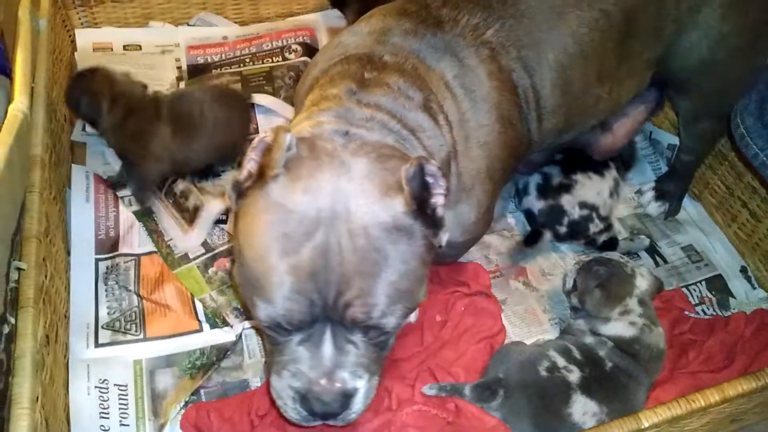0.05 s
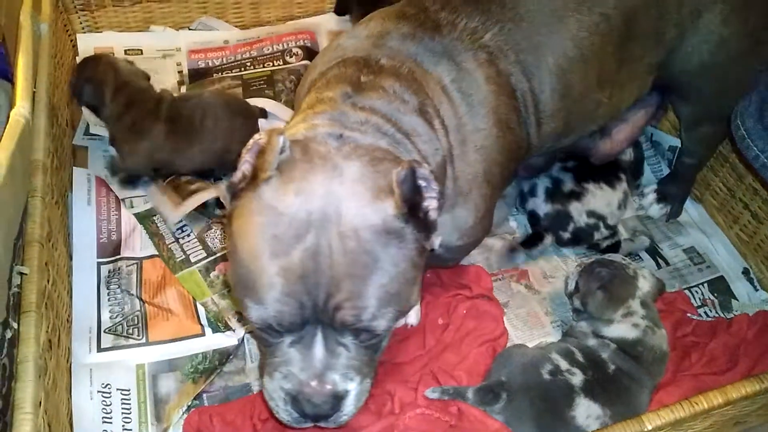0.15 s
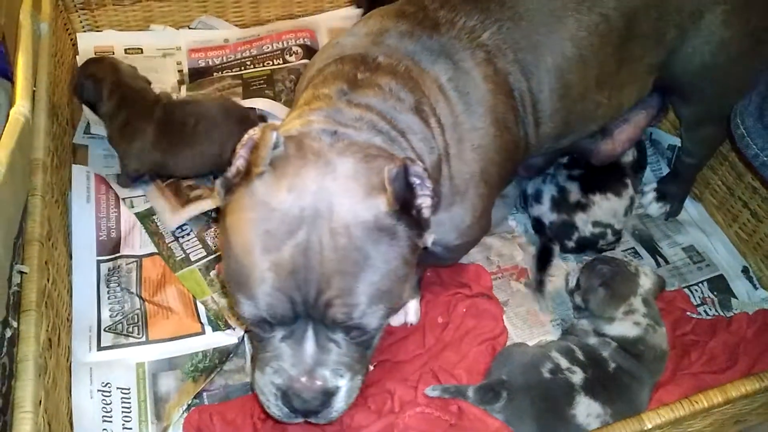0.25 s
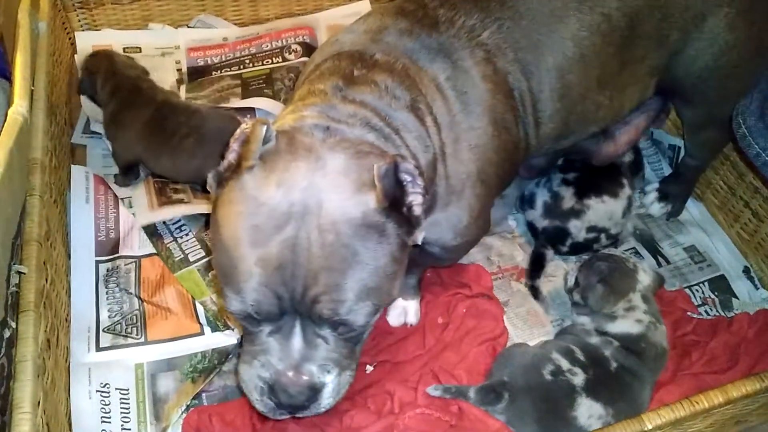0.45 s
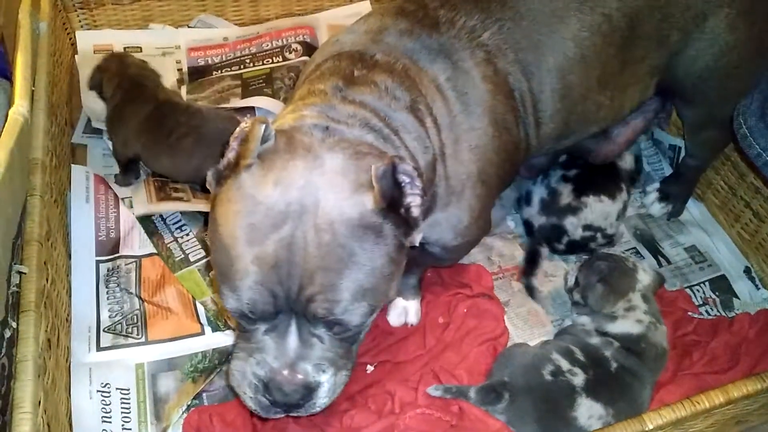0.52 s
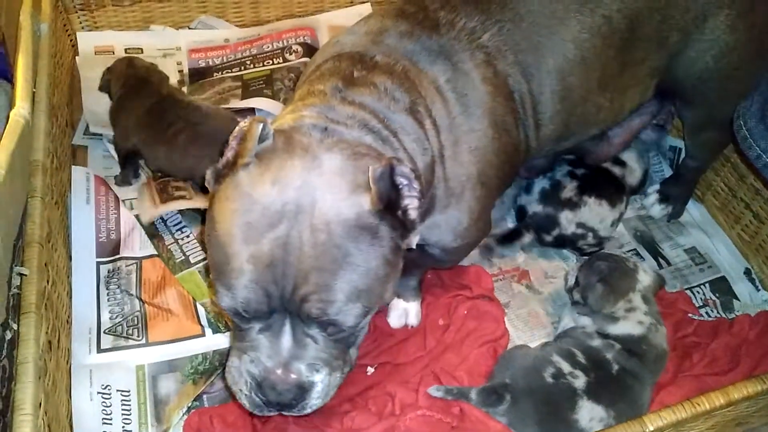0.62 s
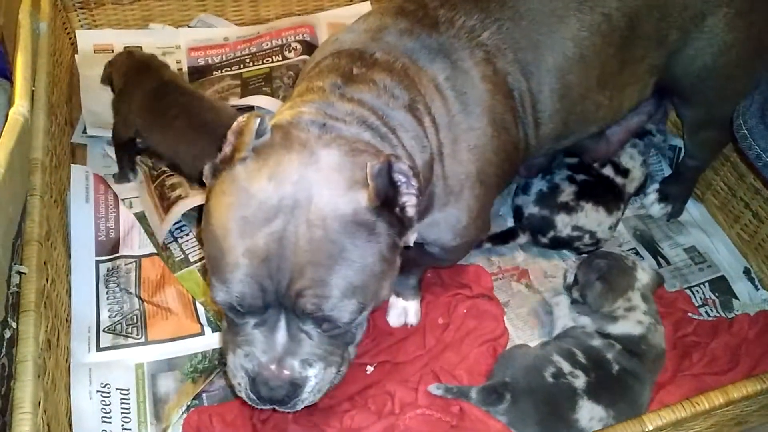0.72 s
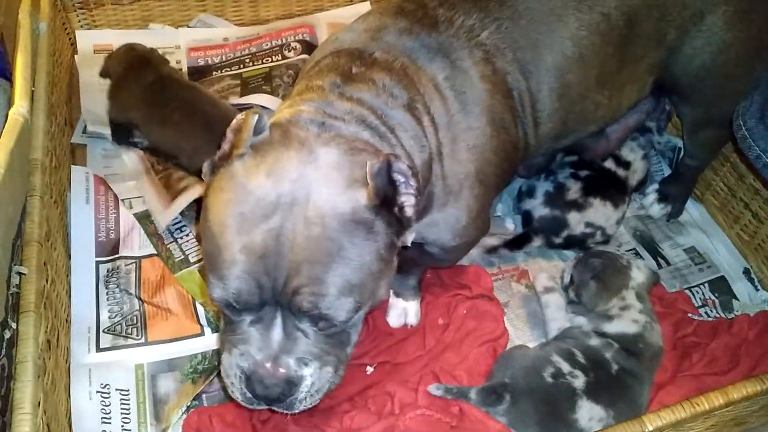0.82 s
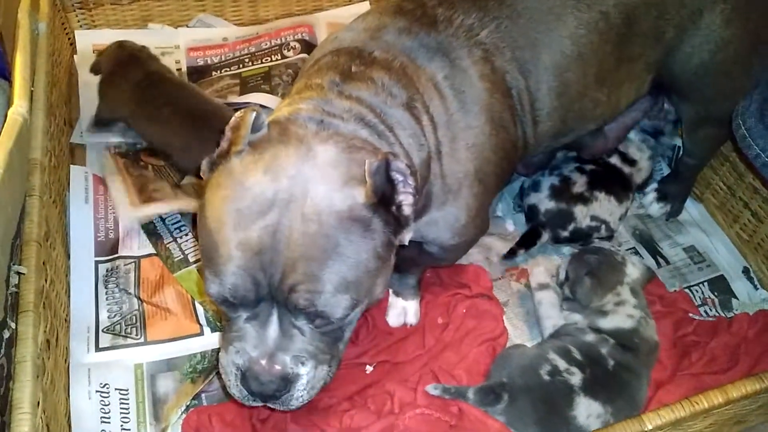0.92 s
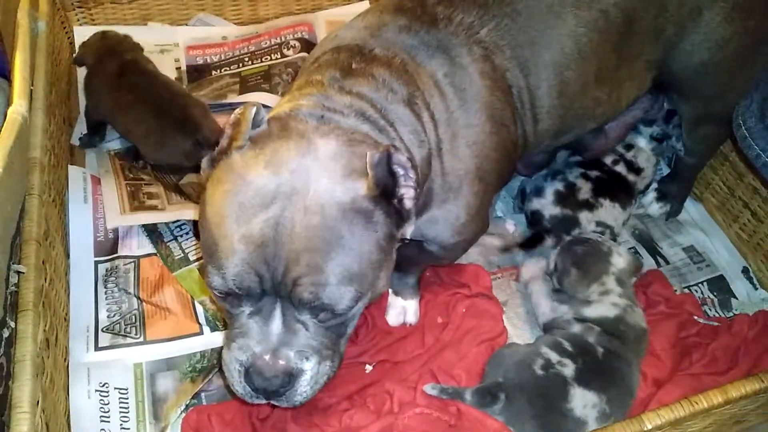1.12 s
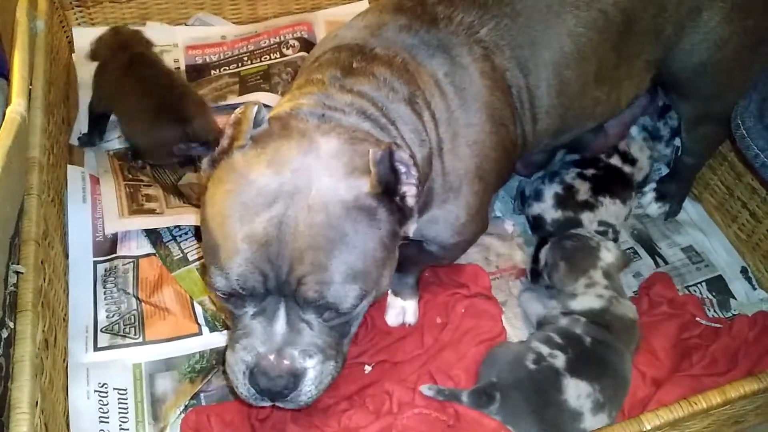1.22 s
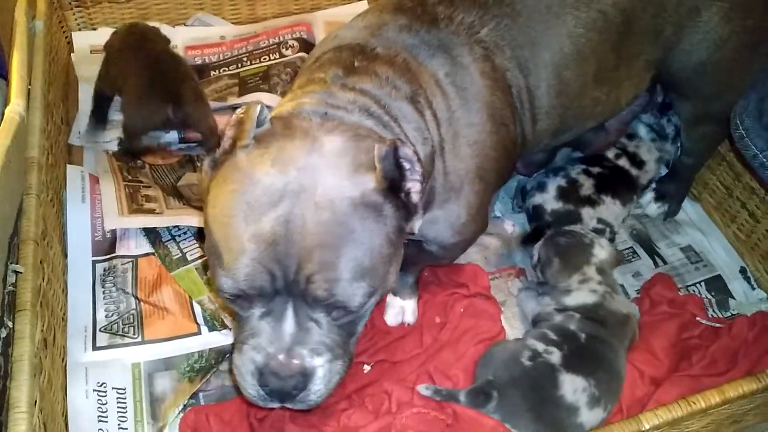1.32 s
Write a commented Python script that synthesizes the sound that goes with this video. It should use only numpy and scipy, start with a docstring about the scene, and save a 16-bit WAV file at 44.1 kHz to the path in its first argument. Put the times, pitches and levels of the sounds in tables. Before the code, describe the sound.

Paper slides and crackles under the paws of dogs moving in a basket.

```python
"""A dog and her puppies shift on newspaper in a wicker basket, close to a phone in a small room.
After a moment of silence, sheets slide with a fine crackle and bodies rumble over the padded floor.
Paws thud and crumple the paper; its creases snap, loudest at 0.9 s. Then the sliding falls away,
leaving a few last crumples, rasps, small knocks and thuds. Throughout, the room gives the paper
a short tail and the microphone ports ring in the high treble."""
import sys
import numpy as np
from scipy import signal
from scipy.fft import rfft, irfft
from scipy.io import wavfile
from scipy.ndimage import uniform_filter1d

SR = 44100
rng = np.random.default_rng(int(sys.argv[2]) if len(sys.argv) > 2 else 0)


def unload_audio(sound):
    """Save the sound as a 16-bit wav file, at the path given as the first command line argument."""
    columns = np.transpose(np.atleast_2d(sound))
    # keep every value between -1 and 1, then stretch to whole-number steps
    steps = np.round(np.clip(columns, -1, 1) * 32767)
    wavfile.write(sys.argv[1], SR, steps.astype(np.int16))


N = 59535
TIME_S = np.arange(N) / SR
BIN_HZ = np.fft.rfftfreq(N, 1 / SR)


def undb(db):
    """Decibels to gain."""
    return 10 ** (np.asarray(db) / 20)


def unit(x):
    """Scale to rms 1."""
    return x / np.sqrt(np.mean(x ** 2))


def fader(points):
    """Gain riding through (time_s, level_db) points."""
    return undb(np.interp(TIME_S, *np.array(points).T))


def swell(peak_s, rise_s, decay_s):
    """Exponential rise to a peak, then exponential decay."""
    t = TIME_S - peak_s
    return np.exp(np.minimum(t / rise_s, -t / decay_s))


def pan(db):
    """Left and right gains, the left louder by db."""
    return undb(np.array([[db], [-db]]) / 2)


def equalise(x, points):
    """Minimum-phase EQ of unit power through (freq_hz, gain_db) points."""
    hz, db = np.array(points).T
    log_hz = np.log(np.fft.rfftfreq(2 * N, 1 / SR) + 1)
    gain = unit(undb(np.interp(log_hz, np.log(hz), db)))
    cepstrum = irfft(np.log(gain))[:N]
    cepstrum[1:] *= 2
    return irfft(rfft(x, 2 * N) * np.exp(rfft(cepstrum, 2 * N)))[..., :N]


def band(x, centre_hz, width_hz, order=1):
    """Band-pass of gain 1 at the centre."""
    low = np.hypot(centre_hz, width_hz / 2) - width_hz / 2
    return signal.sosfilt(signal.butter(order, [low, low + width_hz], "band", fs=SR, output="sos"), x)


def soften(x, top_hz):
    """Gentle low-pass: softer folds give less of the highest treble."""
    return signal.sosfilt(signal.butter(2, top_hz, fs=SR, output="sos"), x + 1e-18)


APART_HZ, LEFT_LEAD_S = 1190, 0.00012
def mic_pair(pair):
    """Two unrelated signals become stereo: alike in the bass, apart in the treble, left just ahead."""
    angle = np.pi / 4 * np.minimum(0.23 + 0.87 * BIN_HZ / (BIN_HZ + APART_HZ), 1)
    mid, side = rfft(pair) * np.array([np.cos(angle), np.sin(angle)])
    right_delay = np.exp(-2j * np.pi * BIN_HZ * LEFT_LEAD_S)
    return irfft(np.array([mid + side, (mid - side) * right_delay]), N)


def stereo_noise():
    """White noise spread across the two microphone ports."""
    return mic_pair(rng.standard_normal((2, N)))


# EQ of the quiet room: freq_hz, gain_db
ROOM_TONE_EQ = [(25, -14), (80, 2), (300, -11), (1000, -17), (4000, -10.5), (16000, -40)]
def room_tone(level_db=-80.5):
    """A faint, steady bed of bass-heavy noise."""
    return undb(level_db) * equalise(stereo_noise(), ROOM_TONE_EQ)


# Fader ride of the dragging: time_s, level_db
DRAG_FADER = [(.13, -92), (.19, -72), (.24, -67.5), (.32, -59.5), (.41, -65), (.50, -58.5), (.59, -63.5),
              (.68, -59.5), (.75, -57), (.83, -63), (.89, -65), (.93, -85), (1.04, -78.5), (1.10, -95),
              (1.35, -77.5)]
# EQ of the padded floor: freq_hz, gain_db
DRAG_EQ = [(25, -35), (50, -8), (95, 4), (160, -8.5), (230, -1), (380, -8), (510, 0), (750, -9),
           (1500, -16.5), (4000, -52)]
def basket_rumble():
    """Bodies drag over the padded floor with a low rumble."""
    return equalise(stereo_noise(), DRAG_EQ) * fader(DRAG_FADER)


# Paws landing: start_s, pitch_hz, decay_s, level_db
PAW_THUDS = [(0.247, 60, 0.025, -59.5), (0.636, 119, 0.0089, -43.5), (0.643, 51, 0.026, -52),
             (.745, 69, .02, -50.5), (.812, 85, 0.012, -57), (.945, 70.4, .012, -64),
             (1.032, 85, 0.0085, -67), (1.21, 81.5, 0.0097, -51.5), (1.236, 59.4, 0.01, -51)]
def paw_thuds(rise_s=0.0034):
    """Each paw knocks the basket floor into a low, quickly damped tone."""
    out = 0
    for start_s, pitch_hz, decay_s, level_db in PAW_THUDS:
        t = np.maximum(TIME_S - start_s, 0)
        envelope = (1 - np.exp(-t / rise_s)) * np.exp(-t / decay_s)
        out = out - undb(level_db) * np.sin(2 * np.pi * pitch_hz * t) * envelope
    return out


def crackle(grains_per_s=2300, spread_db=3.5, max_spreads=3.42, hiss_db=-4):
    """Paper fibres catch and let go: dense clicks of uneven size over a fine hiss."""
    hits = rng.random((2, N)) < grains_per_s / SR
    size = undb(spread_db * np.minimum(rng.exponential(size=(2, N)), max_spreads))
    polarity = np.sign(rng.standard_normal((2, N)))
    hiss = undb(hiss_db) * rng.standard_normal((2, N))
    return unit(mic_pair(unit(hits * size * polarity) + hiss))


# Fader ride of the sliding: time_s, level_db
SLIDE_FADER = [(.13, -72.5), (.16, -67.5), (.22, -57.5), (.275, -61), (.31, -54.5), (.37, -57),
               (.42, -59.5), (.46, -51.5), (.53, -56), (.59, -57), (.65, -53), (.69, -57.5), (.77, -50.5),
               (.87, -51.5), (.95, -72), (1.03, -74), (1.08, -79.5), (1.35, -78)]
# EQ of paper on paper: freq_hz, gain_db
SLIDE_EQ = [(150, -28), (500, -3), (1000, 0), (2000, -1), (4000, 0.5), (7000, 2), (10000, 3.5), (13000, 1),
            (16000, -2)]
def sliding_sheets(catch_db=1.3):
    """Sheets rub over each other, catching unevenly so the level flutters."""
    catch = unit(uniform_filter1d(rng.standard_normal(N), size=300))
    return equalise(crackle() * fader(SLIDE_FADER) * undb(catch_db * catch), SLIDE_EQ)


# Rasps and knocks: peak_s, rise_s, decay_s, centre_hz, width_hz, level_db
RASPS_AND_KNOCKS = [(0.2027, 0.00037, 0.0016, 2450, 1800, -48.5), (0.2027, .0004, 0.0093, 10940, 1780, -47),
                    (0.351, 0.00088, 0.011, 2260, 930, -53.5), (0.365, 0.0036, 0.0055, 2220, 895, -64),
                    (.511, .001, 0.0069, 4400, 1500, -48), (.567, 0.0033, 0.012, 1100, 550, -54.5),
                    (1.01, 0.0065, 0.0059, 470, 390, -57), (1.007, 0.0068, 0.0064, 1460, 1300, -50),
                    (1.126, 0.0033, 0.0065, 1120, 500, -64.5), (1.126, 0.0048, 0.017, 6340, 2200, -57.5),
                    (1.169, 0.0088, 0.016, 7000, 2560, -66), (1.166, 0.017, 0.0089, 1700, 1840, -75),
                    (1.214, 0.0014, 0.011, 226, 159, -67.5), (1.293, 0.0083, 0.0093, 1185, 550, -55.5),
                    (1.290, 0.0068, 0.016, 310, 201, -69.5)]
def rasps_and_knocks():
    """Brief paper rasps and small low knocks, each a band of crackle."""
    clicks, out = crackle(), 0
    for peak_s, rise_s, decay_s, centre_hz, width_hz, level_db in RASPS_AND_KNOCKS:
        texture = unit(band(clicks, centre_hz, width_hz, order=2))
        out = out + texture * swell(peak_s, rise_s, decay_s) * undb(level_db)
    return out


# Paws pressing on paper: peak_s, rise_s, decay_s, crisp_db, body_db, pan_db, top_hz
PAW_PRESSES = [(0.284, .0015, 0.041, -50.5, -57, 1, 14000), (.362, .015, 0.014, -59, -54.5, -1, 12000),
               (.444, 0.014, 0.021, -52.5, -57.5, 2, 15000),
               (0.511, 0.0071, 0.037, -51, -53.5, -0.5, 10400),
               (0.6127, .0006, 0.0065, -50, -48, -1.5, 13000), (.634, .010, 0.021, -55.5, -57.5, 1, 15000),
               (0.693, 0.0022, 0.021, -72, -54.5, 3, 12000), (0.715, 0.00073, 0.0075, -55, -59, 2, 13000),
               (0.734, 0.018, 0.024, -47, -46, 0, 12700), (0.813, 0.0044, 0.012, -45.5, -50.5, 1, 17000),
               (0.856, 0.0069, 0.013, -45.5, -51.5, -0.5, 14000),
               (0.8827, .0006, .003, -40.5, -49.5, 13, 15000),
               (0.897, 0.0072, 0.0042, -46.5, -45.5, -5.5, 10900),
               (0.9058, 0.0046, 0.01, -36, -43.5, 3, 11000), (0.945, 0.012, 0.02, -76, -57.5, -2, 12000),
               (0.983, 0.0098, 0.0061, -45, -74, -2.5, 16700),
               (0.993, 0.0035, 0.026, -41.5, -61, -1.5, 17000),
               (1.231, 0.0037, 0.0063, -72, -74.5, -2, 12100),
               (1.291, 0.006, 0.013, -45.5, -58.5, 3, 10000)]
# EQ of the crisp clicks: freq_hz, gain_db
CRISP_EQ = [(500, -19.5), (2000, -17), (4000, -4), (6000, -2.5), (8000, -1.5), (10000, -1), (13000, -7.5),
            (16000, -3.5)]
# EQ of the sheet's hollow body: freq_hz, gain_db
BODY_EQ = [(200, -30), (650, -23), (950, -2), (1250, -2), (2000, 2.5), (2800, -4), (4000, -2), (8000, -13),
           (16000, -49)]
def crumpling_sheets():
    """Each press gives a flurry of crisp clicks and the hollower sound of the whole sheet."""
    clicks, crisp, body_envelope = crackle(), 0, 0
    for peak_s, rise_s, decay_s, crisp_db, body_db, pan_db, top_hz in PAW_PRESSES:
        press = swell(peak_s, rise_s, decay_s) * pan(pan_db)
        crisp = crisp + soften(clicks * press * undb(crisp_db), top_hz)
        body_envelope = body_envelope + press * undb(body_db)
    return equalise(crisp, CRISP_EQ) + equalise(crackle() * body_envelope, BODY_EQ)


BEND_S, BEND_HZ = .0016, 8955  # a bending wave of this pitch crosses the sheet in this time
# Creases snapping through: start_s, level_db, pan_db, top_hz
CREASE_SNAPS = [(.2024, -44, 11, 16800), (.2113, -49, -7, 17000), (.2833, -52, 14, 12000),
                (.2931, -64, 8, 14000), (.3641, -42, 5, 12000), (.6144, -49, 2, 13000),
                (.6219, -40.5, 3, 14000), (.7141, -45, -5, 14000), (.7361, -44, 1, 13000),
                (.7471, -52, 0, 13000), (.8119, -39, 8, 17000), (.8536, -34, 2, 14000),
                (.8825, -39, -7, 15000), (.8920, -36.5, 14, 12000), (.9030, -27, 1, 10600),
                (.9064, -24.5, 4, 10500), (.9126, -32, 0, 11300), (.9849, -35, 2, 14000),
                (.9921, -38, 0, 16600), (1.1241, -55.5, -7, 14000), (1.2891, -38.5, 3.5, 10200)]
# Bright EQ of a snap: freq_hz, gain_db
SNAP_EQ = [(500, -29), (1200, -7), (2500, -21.5), (5000, 3.5), (8000, 6.5), (11000, 3), (13000, 0.5),
           (16000, -3.5)]
def snapping_creases(grit_db=-6, grit_decay_s=0.001):
    """Creases buckle: a click, smeared as treble outruns bass in the sheet, with a little grit."""
    dispersion = np.exp(-2j * np.pi * BEND_S * (2 * np.sqrt(BIN_HZ * BEND_HZ) - BIN_HZ))
    grit, out = undb(grit_db) * stereo_noise(), 0
    for start_s, level_db, pan_db, top_hz in CREASE_SNAPS:
        burst = swell(start_s, rise_s=.00005, decay_s=grit_decay_s)
        arrival_s = start_s + np.array([[0], [LEFT_LEAD_S * rng.uniform(0, 1.85)]])  # left, right
        delay = np.exp(-2j * np.pi * BIN_HZ * arrival_s)
        click = irfft(dispersion * delay, N) * np.linalg.norm(burst)  # same energy as the burst
        out = out + soften(click + grit * burst, top_hz) * undb(level_db) * pan(pan_db)
    return equalise(out, SNAP_EQ)


def reverb(x, early_db=-6.5, early_decay_s=.006, tail_db=-11, t60_s=0.18):
    """Quick reflections off the basket's sides, then the room's short tail."""
    t = np.arange(SR // 2) / SR
    early, tail = rng.standard_normal((2, 2, len(t)))
    early = unit(early * np.exp(-t / early_decay_s) * (t > .001))
    tail = unit(tail * undb(-60 * t / t60_s) * (t > .006))
    response = (undb(early_db) * early + undb(tail_db) * tail) / np.sqrt(len(t))
    return x + signal.fftconvolve(x, response, axes=1)[:, :N]


def scene():
    """The mix: room tone, paper and small knocks with reflections, and the basket's dry low end."""
    rustle = sliding_sheets() + crumpling_sheets() + snapping_creases() + rasps_and_knocks()
    return room_tone() + reverb(rustle) + basket_rumble() + paw_thuds()


PORT_HZ, PORT_WIDTH_HZ, PORT_BOOST_DB = 9354, 980, 13.5
MIC_OPEN_S, HIGH_CUT_HZ = .13, 15750
def record(dry):
    """The microphone opens after a moment of silence; its ports ring in the treble; the top is cut."""
    ring = (undb(PORT_BOOST_DB) - 1) * band(dry, PORT_HZ, PORT_WIDTH_HZ)
    heard = (dry + ring) * (TIME_S > MIC_OPEN_S)
    return signal.sosfilt(signal.ellip(10, .2, 80, HIGH_CUT_HZ, fs=SR, output="sos"), heard)


dry = scene()
out = record(dry)
unload_audio(out)
```